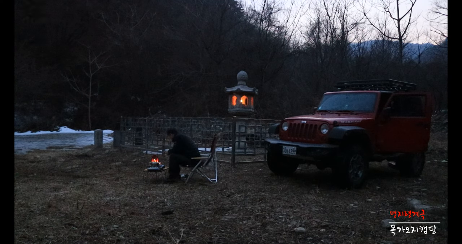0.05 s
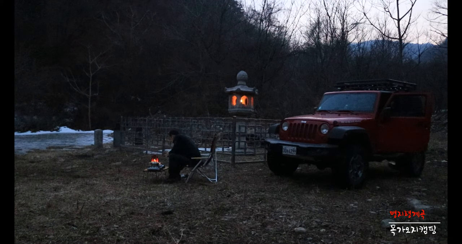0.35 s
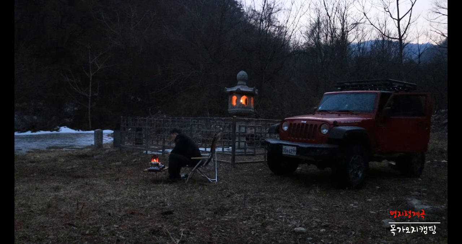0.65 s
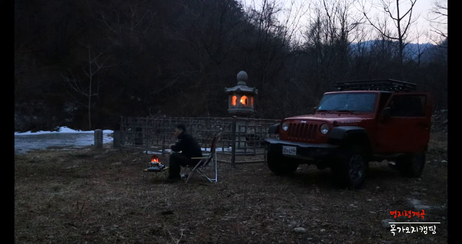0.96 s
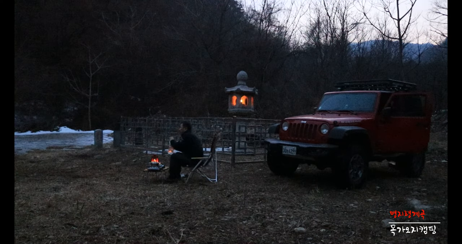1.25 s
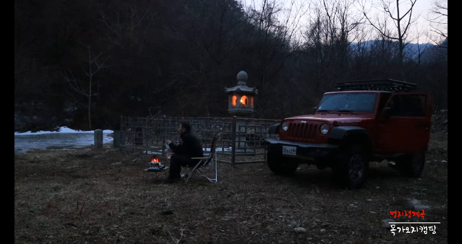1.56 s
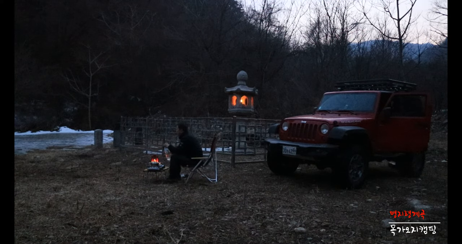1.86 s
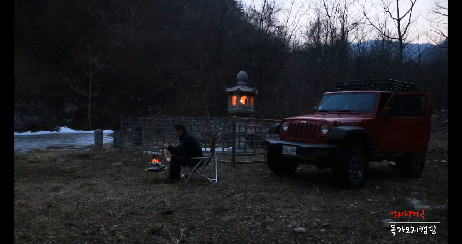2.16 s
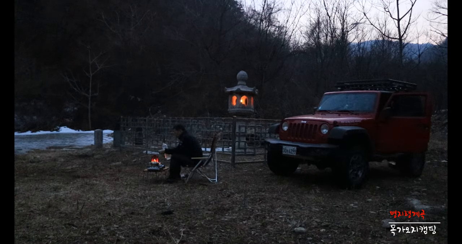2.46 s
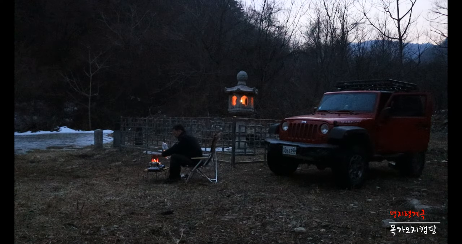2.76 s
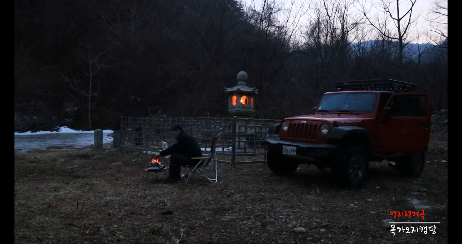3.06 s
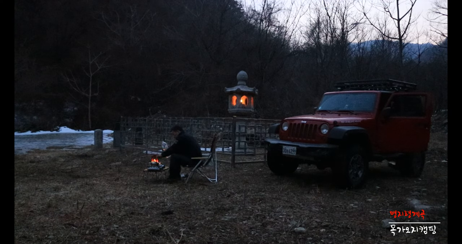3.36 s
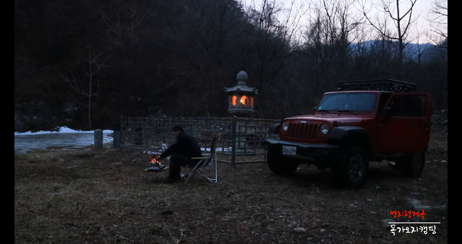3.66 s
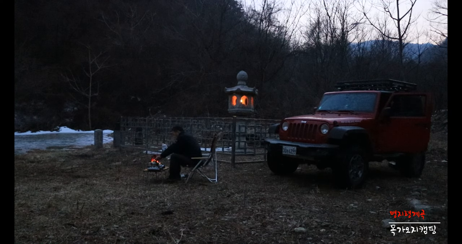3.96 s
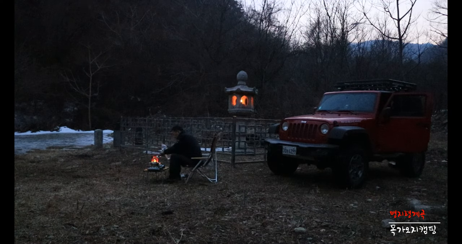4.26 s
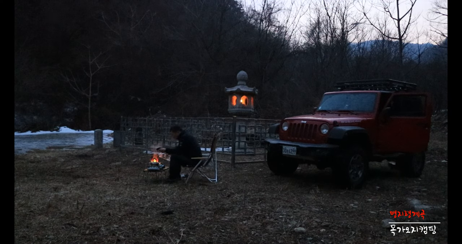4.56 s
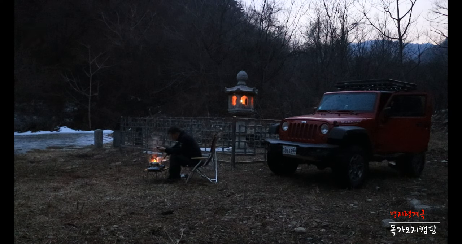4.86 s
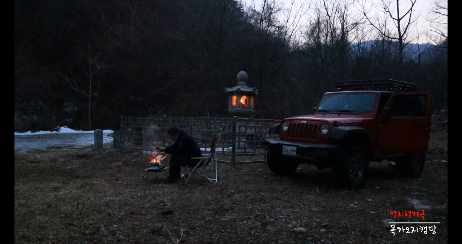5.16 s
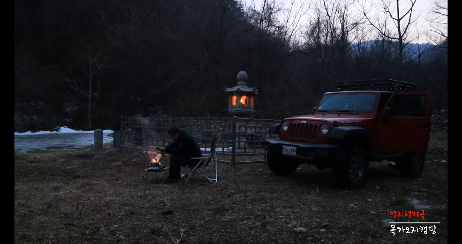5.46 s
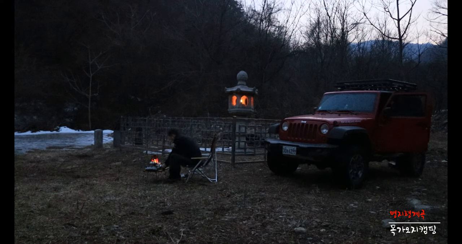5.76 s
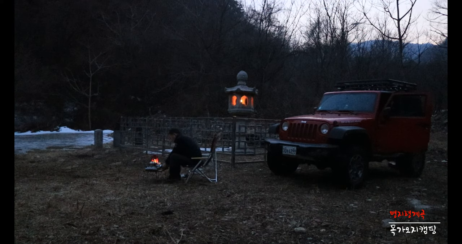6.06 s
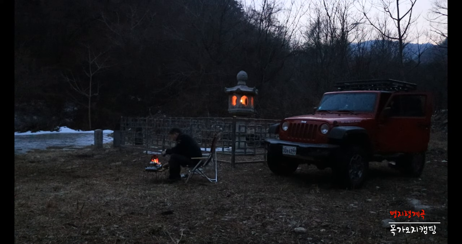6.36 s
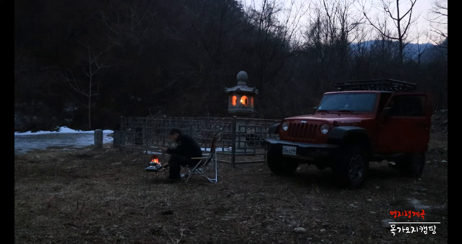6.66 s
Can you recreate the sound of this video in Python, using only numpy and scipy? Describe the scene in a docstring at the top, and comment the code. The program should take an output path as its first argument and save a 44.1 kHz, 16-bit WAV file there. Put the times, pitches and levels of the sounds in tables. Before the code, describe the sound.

Over a steady outdoor hush and fine hiss, sticks and utensils knock lightly at a camp stove. A metal pot is set down, slides briefly and seats with a bright, squeaky clank that rings for a moment. More small clinks and knocks follow, and one sharp, splintering crack comes at the end. The handling sits straight ahead, some metres from the microphone, with a short tail from the clearing.

```python
"""Camp stove at dusk

A valley clearing; some metres straight ahead of a stereo microphone, someone tends a metal pot.
Utensils and sticks knock lightly. The pot is put down and slid, ringing and rattling on its support,
and near the end comes one sharp, splintering crack. Ground and trees scatter a short tail,
over the steady hush of the valley and a fine hiss."""
import sys
import numpy as np
from scipy import signal
from scipy.fft import rfft, irfft, next_fast_len
from scipy.io import wavfile

SR = 44100
rng = np.random.default_rng(int(sys.argv[2]) if len(sys.argv) > 2 else 0)


def waveform_to_disk(signal):
    """Save audio, clipped to [-1, 1], as 16-bit WAV at the path in sys.argv[1]."""
    frames = np.transpose(np.atleast_2d(signal))
    scaled = np.clip(frames, -1, 1) * 32767
    samples = np.round(scaled).astype(np.int16)
    wavfile.write(sys.argv[1], SR, samples)


N = 295911
TIME = np.arange(N) / SR
AGE = TIME[:SR]  # the second that follows a blow

# the pot's modes: (pitch [Hz], level struck on the base [dB], level struck on the rim [dB], t60 [s])
POT_MODES = [(604, -11, -20, .15), (990, -22, -22, .13), (1211, -22, -29, .7), (1315, -10, -18, .13),
             (1777, -4, -32, .5), (1900, -18, -17, .36), (2148, -12, -29, .42), (2246, -19, -27, .45),
             (2345, -10, -22, .1), (2690, -12, -15, .1), (2778, -17, -21, .16), (2989, -25, -16, .15),
             (3359, -15, -9, .15), (3440, -5, -1, .05), (3605, -2, -8, .07), (3662, 1, -2, .09),
             (3720, -3, -19, .08), (4664, -21, -25, .25), (5087, -20, -26, .38), (5870, -10, -33, .1),
             (6663, -25, -24, .3), (6990, -13, -33, .11), (8130, -15, -35, .1), (8590, -15, -32, .14)]
# spectrum of the crowded modes of its wall and support: (frequency [Hz], relative level [dB])
POT_WALL = [(80, -22), (280, 7), (600, 6.5), (900, 0.5), (1300, 5), (2500, 7.5), (3100, -6), (4100, -5),
            (4700, -1), (6200, -6), (8400, -0.5), (9800, -28), (13000, -5), (16000, -20)]
# blows on the pot: (time [s], ring level [dB], place [0 base to 1 rim], clatter level [dB],
# clatter centre [Hz], clatter t60 [s])
POT_BLOWS = [(3.933, -32, 0.08, -35.5, 2520, 0.15), (3.948, -54, 0.8, -50, 5000, .06),
             (4.2305, -17, 1, -29, 2700, 0.084), (4.251, -38, 1, -32, 1900, 0.25),
             (4.292, -30, 1, -41, 3170, 0.037), (5.345, -52, 0, -46.5, 1390, 0.13),
             (5.527, -45.5, 0.18, -45, 5340, 0.056)]
# pushes of the pot across its support: (time [s], hold [s], level [dB])
PUSHES = [(3.953, .005, -54), (4.023, .075, -48)]
# the rim squeaking near its own modes: (time [s], length [s], level [dB], starting pitch [Hz])
SKIDS = [(4.2294, 0.0086, -17.5, 3677), (4.237, 0.033, -34, 3454), (4.2906, 0.007, -30, 3705)]
# a small give, then the snap: (time [s], splinter level [dB], ring level [dB], splinter t60 [s])
CRACKS = [(6.6213, -21, -40, 0.012), (6.6219, -11, -16.5, 0.034), (6.6244, -26.5, -34, 0.11)]
# the modes that the crack rings: (pitch [Hz], relative level [dB], t60 [s])
CRACK_MODES = [(1705, -7, .05), (2010, 0, .042), (2403, 1, .045), (2805, -6, .045), (3120, -7, .055),
               (3750, -4, .05), (4045, -7, .04), (5020, 1, .028), (5260, -1, .02), (5633, -1, .032),
               (6013, -8, .05), (7510, -2, .038), (8090, -6, .025), (8485, -4, .036), (8756, -9, .04),
               (12450, -4, .02), (13080, -4, .018)]
# spectrum of the splintering: (frequency [Hz], relative level [dB])
SPLINTER_SPECTRUM = [(60, -27), (300, -17), (600, -8.5), (1100, -14.5), (1500, -3.5), (2200, 8), (3300, -1),
                     (4500, 2), (5300, -4), (6700, -1), (7700, 2), (10400, -7.5), (12800, -1.5),
                     (16000, -17)]
# short metallic clinks of the pot and utensils: (time [s], level [dB], pitch [Hz], t60 [s])
CLINKS = [(.787, -49, 2580, .03), (2.081, -43, 12400, 0.0084), (3.614, -44, 3920, 0.02),
          (3.644, -46, 604, 0.16), (4.249, -35, 7030, .035), (4.293, -34, 2900, 0.034),
          (5.041, -45.5, 3540, 0.024), (5.315, -47, 3370, 0.1), (5.348, -41, 674, 0.11),
          (5.35, -51, 1870, .08), (5.402, -45, 1857, 0.11), (5.514, -38, 3180, 0.025),
          (5.526, -38, 1410, .037), (5.529, -49.5, 5020, 0.087), (5.539, -45, 3680, 0.026),
          (5.601, -44, 1810, 0.07), (5.601, -51, 3870, 0.069), (5.644, -56, 7100, 0.064),
          (5.67, -52.5, 3740, 0.057), (5.683, -45, 1700, 0.045), (5.991, -48.5, 3320, .041),
          (6.543, -43, 1622, 0.087)]
# dull knocks of sticks and gear: (time [s], body level [dB], pitch [Hz], t60 [s], tick level [dB])
KNOCKS = [(0.6142, -45.5, 490, 0.05, -52), (.643, -51, 646, .05, -60), (0.74, -40.5, 634, 0.031, -60),
          (0.784, -45.5, 616, 0.05, -54), (1.27, -52, 600, 0.044, -64), (1.348, -45, 930, 0.066, -50),
          (2.07, -51.5, 546, 0.1, -59), (2.082, -48, 5000, 0.014, -50), (2.087, -45.5, 1300, 0.097, -62),
          (3.05, -55, 2700, .03, -57), (3.544, -54.5, 2740, 0.095, -67), (3.618, -37.5, 1950, 0.081, -57),
          (3.64, -45, 2440, 0.11, -68), (4.938, -52, 2950, 0.029, -75), (5.036, -58, 6000, .025, -49),
          (5.316, -53.5, 6000, 0.21, -50), (5.5973, -36, 710, 0.026, -51), (5.613, -47, 1500, 0.052, -53),
          (5.926, -50, 496, 0.038, -64), (5.974, -46, 500, 0.11, -62), (5.993, -48.5, 1610, 0.033, -64),
          (6.044, -43, 2070, 0.1, -40.5), (6.218, -42, 1640, 0.075, -64), (6.393, -50, 1420, 0.18, -55)]
# things set down on the ground: (time [s], level [dB], pitch [Hz])
THUDS = [(0.619, -53, 130), (2.089, -43.5, 302), (2.128, -50, 105), (3.622, -49.5, 420), (3.94, -47.5, 280),
         (6.632, -41.5, 560), (6.665, -40, 170), (6.7, -39.5, 240)]
# soft rubbing and rustling: (middle time [s], length [s], level [dB], centre [Hz])
RUSTLES = [(1.35, 0.52, -68, 900), (1.76, 0.11, -65.5, 990), (2.0, 0.058, -59, 1460),
           (2.0, 0.069, -60.5, 7850), (2.115, 0.08, -59, 900), (4.06, 0.089, -55.5, 560),
           (4.53, 0.17, -57.5, 1490), (4.53, 0.11, -61, 4500), (5.602, 0.29, -61.5, 1790),
           (6.024, 0.12, -59.5, 880), (6.321, 0.46, -62, 1440)]
# thin squeals of rubbed metal: (middle time [s], length [s], level [dB], pitch [Hz])
SQUEALS = [(4.055, 0.02, -55, 5860), (4.095, 0.022, -60, 6990), (4.112, 0.034, -58, 5240),
           (4.137, 0.056, -56, 2290), (4.138, 0.021, -55.5, 1150), (4.53, 0.055, -61, 7330),
           (4.55, 0.12, -63.5, 4250), (5.815, 0.037, -63.5, 2090), (5.86, 0.061, -60.5, 1687)]
# what the clearing sends back to the microphone: (frequency [Hz], relative level [dB])
SCATTER_SPECTRUM = [(100, 1), (500, 12.5), (1200, 11.5), (2200, -2.5), (3700, -2.5), (5500, -3.5),
                    (8000, -3.5), (14000, -18)]
# spectrum of the far valley and the hiss: (frequency [Hz], relative level [dB])
HUSH_SPECTRUM = [(12, -17), (20, -3), (38, -5.5), (153, -2.5), (219, -3.5), (252, -3.5), (352, -2),
                 (416, -4), (857, -5), (985, -6), (1300, -7), (1580, -9.5), (4430, -14.5), (12800, -15.5),
                 (15500, -15.5)]
# stereo width of the hush: (frequency [Hz], side minus mid [dB])
HUSH_SIDE = [(60, -8), (110, -10), (200, -11), (380, -11.5), (700, -11), (1290, -10.5), (2380, -5),
             (4400, -2), (8120, -2), (15000, -2)]


def pot(base_damping_per_s=3.8):
    """Each blow rings the pot and rattles it; landing flat on the support damps the ring sooner."""
    out = np.zeros(N)
    for s, ring_db, place, clatter_db, hz, t60 in POT_BLOWS:
        ring = pot_ring(place) * np.exp(-base_damping_per_s * (1 - place) * AGE)
        add(out, s, undb(ring_db) * ring + undb(clatter_db) * clatter(hz, t60))
    return out


def pot_ring(place, rise_s=0.0036):
    """The pot's answer to one blow; where it lands decides which modes speak."""
    ring = sum(undb(base_db + place * (rim_db - base_db)) * fade(t60) * np.sin(2 * np.pi * hz * AGE)
               for hz, base_db, rim_db, t60 in POT_MODES)
    return ring * (1 - np.exp(-AGE / rise_s))


def clatter(hz, t60, spread=1.65):
    """The thin wall rattles against the support; the contact picks a region of its crowded modes."""
    wall = colour(rng.standard_normal(SR), POT_WALL)
    return unit(band(wall, hz, spread * hz)) * fade(t60)


def slide(mode_width_hz=100, grind_db=-12, attack_s=0.038, release_s=0.031):
    """Dense slips drive the pot's modes, which the contact damps and widens."""
    slips = band(rng.standard_normal(N), hz=3830, width_hz=7900)
    ring = sum(undb(base_db) * steep_band(slips, hz, mode_width_hz) for hz, base_db, _, _ in POT_MODES)
    push = np.zeros(N)
    for s, hold, db in PUSHES:
        build = np.minimum(AGE / attack_s, 1)
        let_go = np.exp(-np.maximum(AGE - attack_s - hold, 0) / release_s)
        add(push, s, undb(db) * build * let_go)
    return push * (unit(ring) + undb(grind_db) * unit(slips))


def skids(sag_hz_per_s=5100, wobble_turns=0.037, attack_s=0.00098, release_s=0.0024):
    """Stick and slip lock briefly to the rim's ring; the pitch sinks as the pot seats."""
    out = np.zeros(N)
    for s, length, db, hz in SKIDS:
        grip = (1 - np.exp(-AGE / attack_s)) * np.exp(-np.maximum(AGE - length, 0) / release_s)
        turns = np.cumsum(hz - sag_hz_per_s * AGE) / SR + wobble_turns * wander(AGE, points=400)
        add(out, s, undb(db) * grip * np.sqrt(2) * np.sin(2 * np.pi * turns))
    return out


def crack(low_cut_hz=330):
    """A sharp snap: bursts of splintering milliseconds apart, each with a short, hard ring."""
    out = np.zeros(N)
    ring = sum((-1) ** k * undb(db) * fade(t60) * np.sin(2 * np.pi * hz * AGE)
               for k, (hz, db, t60) in enumerate(CRACK_MODES))
    for s, splinter_db, ring_db, t60 in CRACKS:
        splinter = unit(colour(rng.standard_normal(SR), SPLINTER_SPECTRUM)) * fade(t60)
        add(out, s, undb(splinter_db) * splinter + undb(ring_db) * ring)
    # so small a thing radiates little bass
    return signal.sosfilt(signal.butter(1, low_cut_hz, "high", fs=SR, output="sos"), out)


def clinks(tick_db=-11):
    """The pot or a utensil clinks briefly at one leading pitch; its tick grows with the blow."""
    out = np.zeros(N)
    for s, db, hz, t60 in CLINKS:
        add(out, s, undb(db) * (body(hz, t60, spread=0.38) + undb(tick_db) * tick()))
    return out


def knocks():
    """A tick at the contact, with the damped, crowded modes of the stick or gear touched."""
    out = np.zeros(N)
    for s, db, hz, t60, tick_db in KNOCKS:
        add(out, s, undb(db) * body(hz, t60, spread=1.14) + undb(tick_db) * tick())
    return out


def thuds():
    """Soft ground gives a low, broad bump and no tick."""
    out = np.zeros(N)
    for s, db, hz in THUDS:
        add(out, s, undb(db) * body(hz, t60=0.1, spread=0.81))
    return out


def body(hz, t60, spread, crowded_spread=0.69):
    """A touched body rings: one clear mode at a small spread (width over pitch), a crowd at a large."""
    clear_share = np.exp(-(spread / crowded_spread) ** 2)  # of the energy
    mode = np.sqrt(2) * np.sin(2 * np.pi * hz * AGE) * fade(t60) * (1 - np.exp(-AGE * hz / 2))
    return np.sqrt(clear_share) * mode + np.sqrt(1 - clear_share) * crowded_modes(hz, spread * hz, t60)


def tick():
    """The brief bright click of two hard surfaces meeting."""
    return crowded_modes(hz=4500, width_hz=10000, t60=0.02)


def crowded_modes(hz, width_hz, t60):
    """Many modes around hz that die together; starts near rms 1."""
    decay = fade(t60)
    ring = steep_band(rng.standard_normal(SR) * decay + 1e-18, hz, width_hz)
    return unit(ring) * rms(decay)


def rubs(strokes, width_at, grain_db):
    """Grainy friction swells and fades: wide bands rustle, narrow ones squeal."""
    out = np.zeros(N)
    for middle, length, db, hz in strokes:
        grain = undb(grain_db * wander(AGE, points=200))
        swell = np.exp(-2 * ((AGE - 0.5) / length) ** 2)
        rub = steep_band(rng.standard_normal(SR) * grain, hz, width_at(hz)) * swell
        add(out, middle - 0.5, undb(db) * unit(rub) * rms(swell))
    return out


def taps(per_s=2, level_db=-64, centre_hz=1400, range_octaves=0.59):
    """Faint fumbling at the stove: tiny knocks at random times and pitches."""
    out = np.zeros(N)
    for when, height in rng.random((int(per_s * N / SR), 2)):
        hz = centre_hz * 2 ** (range_octaves * (2 * height - 1))
        add(out, when * N / SR, undb(level_db) * body(hz, t60=0.049, spread=1.14))
    return out


def clearing(x, t60=0.49, build_s=0.0076):
    """Ground, trees and a parked car scatter a diffuse tail back to the microphone."""
    tail = colour(rng.standard_normal(SR), SCATTER_SPECTRUM) * fade(t60) * (1 - np.exp(-AGE / build_s))
    return signal.fftconvolve(x, tail / np.sqrt(np.sum(tail ** 2)))[:N]


def hush(level_db=-57, waver_db=0.76):
    """Far-off valley noise and fine hiss as mid and side; the level barely wavers."""
    mid, side = (unit(colour(rng.standard_normal(N), HUSH_SPECTRUM)) for _ in range(2))
    gain = undb(level_db + waver_db * wander(TIME, points=30))
    return gain * mid, gain * colour(side, HUSH_SIDE)


def undb(db):
    """Decibels to gain."""
    return 10 ** (np.asarray(db) / 20)


def rms(x):
    """Root mean square level."""
    return np.sqrt(np.mean(x ** 2))


def unit(x):
    """Scale to rms 1."""
    return x / rms(x)


def fade(t60):
    """Exponential decay by 60 dB in t60 seconds."""
    return np.exp(-np.log(1000) * AGE / max(t60, 1e-3))


def wander(time, points):
    """A line through evenly spaced random values."""
    return np.interp(time, np.linspace(0, time[-1], points), rng.standard_normal(points))


def add(track, s, sound):
    """Mix a sound into the track at s seconds."""
    start = min(int(s * SR), N)
    track[start:start + len(sound)] += sound[:N - start]


def band(x, hz, width_hz):
    """Two-pole resonance, gain 1 at the centre."""
    angle = 2 * np.pi * min(hz, SR / 2 - 1000) / SR
    damping = np.sin(angle) * width_hz / hz / 2
    return signal.lfilter([damping, 0, -damping], [1 + damping, -2 * np.cos(angle), 1 - damping], x)


def steep_band(x, hz, width_hz):
    """The same resonance twice, for steeper skirts."""
    return band(band(x, hz, width_hz), hz, width_hz)


def colour(x, curve):
    """Filter by a curve of (frequency [Hz], gain [dB])."""
    hz, db = np.transpose(curve)
    size = next_fast_len(len(x))
    bin_hz = np.maximum(np.fft.rfftfreq(size, 1 / SR), 1)
    gain = undb(np.interp(np.log(bin_hz), np.log(hz), db))
    return irfft(rfft(x, size) * gain, size)[:len(x)]


def scene(scatter_mid_db=-19, scatter_side_db=-35):
    """The stove stands straight ahead of the microphone; only scatter and hush have any width."""
    rustles = rubs(RUSTLES, width_at=lambda hz: 2 * hz, grain_db=2.0)
    squeals = rubs(SQUEALS, width_at=lambda hz: 35 * (hz / 2000) ** 2, grain_db=-1.5)
    friction = slide() + skids() + rustles + squeals
    handling = pot() + friction + knocks() + clinks() + thuds() + crack() + taps()
    hush_mid, hush_side = hush()
    mid = handling + undb(scatter_mid_db) * clearing(handling) + hush_mid
    side = undb(scatter_side_db) * clearing(handling) + hush_side
    return np.array([mid + side, mid - side])


def record(dry, ceiling=0.95, top_hz=15700):
    """The recorder rounds the very loudest peak and cuts the top steeply."""
    rounded = dry / (1 + (dry / ceiling) ** 4) ** 0.25
    return signal.sosfilt(signal.ellip(10, 0.1, 75, top_hz, fs=SR, output="sos"), rounded)


dry = scene()
out = record(dry)
waveform_to_disk(out)
```